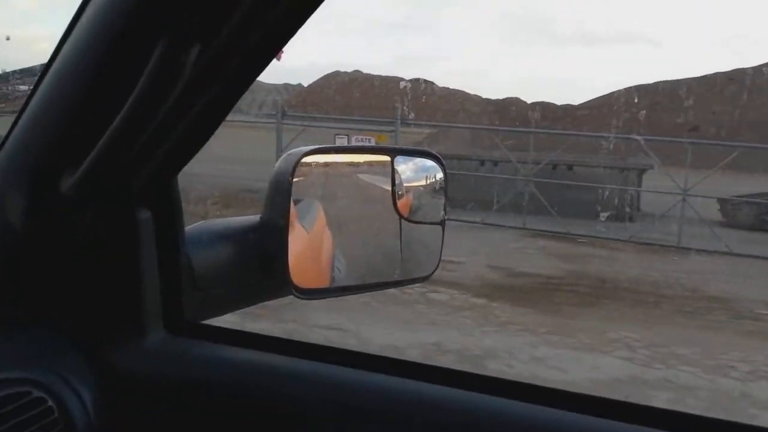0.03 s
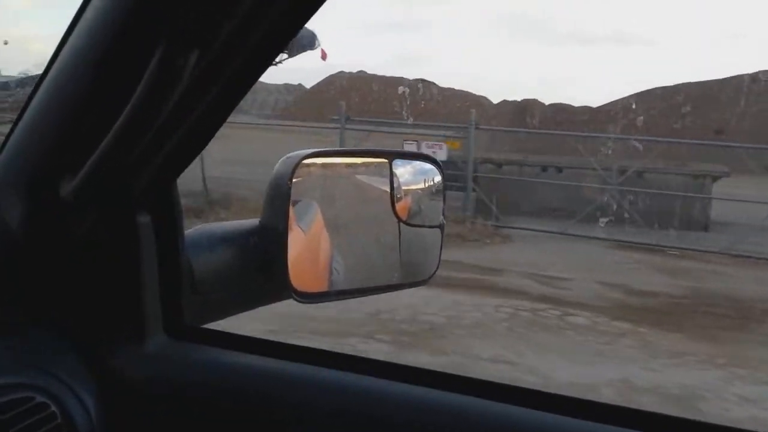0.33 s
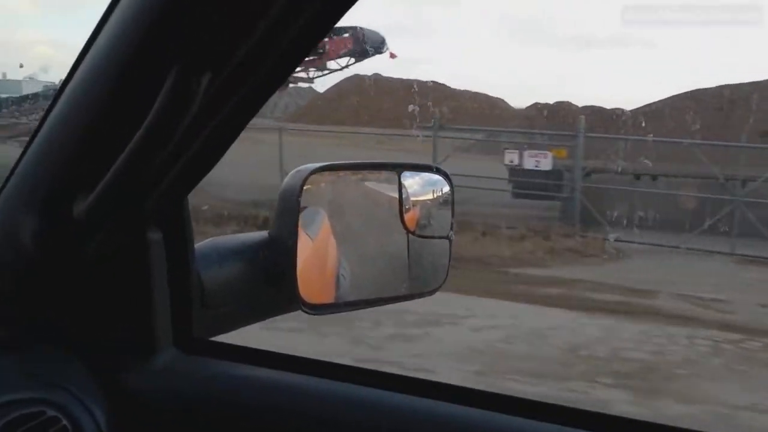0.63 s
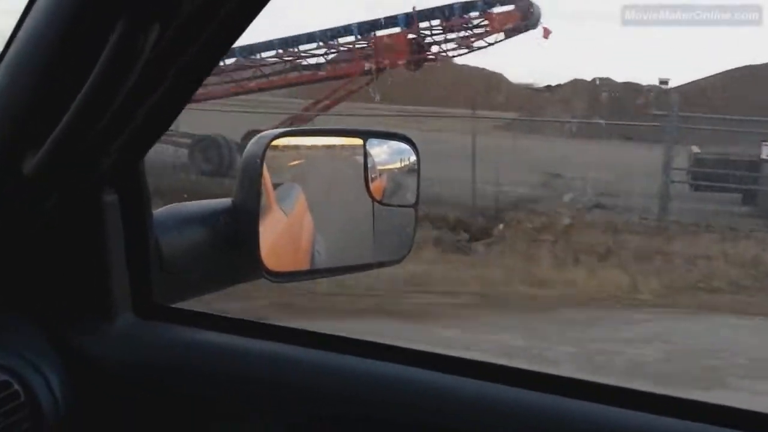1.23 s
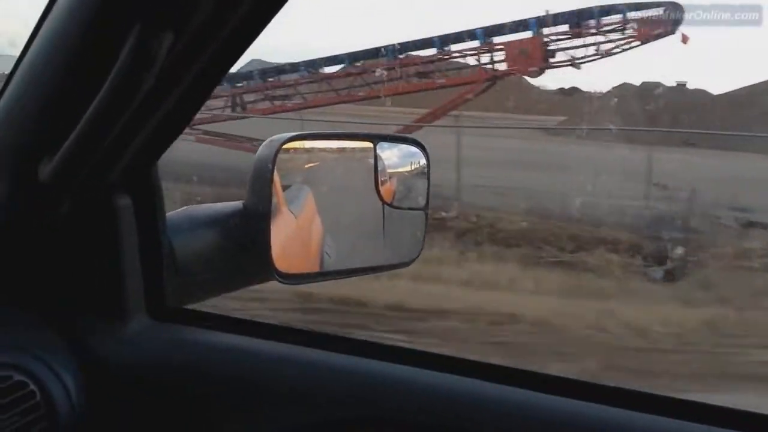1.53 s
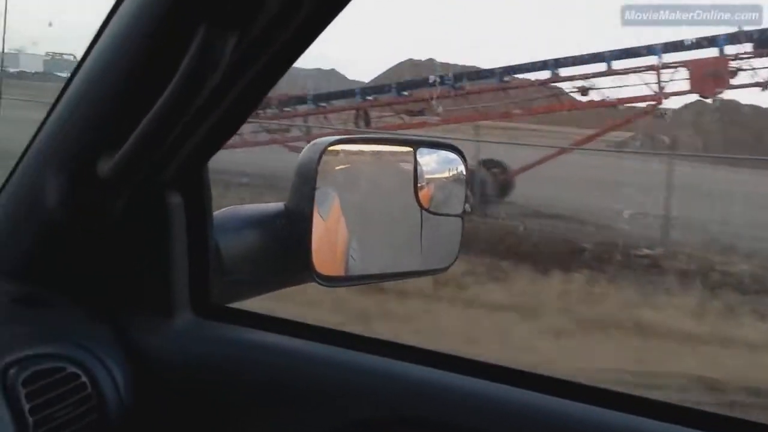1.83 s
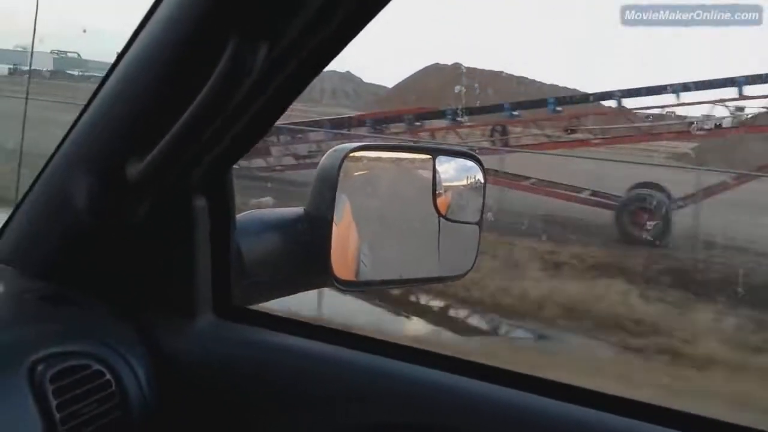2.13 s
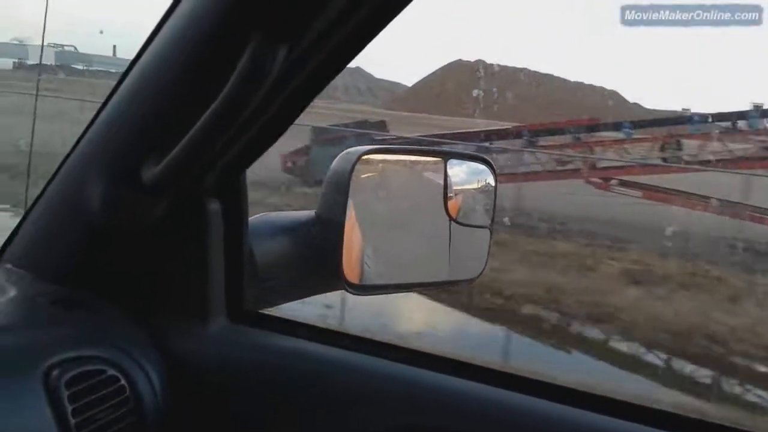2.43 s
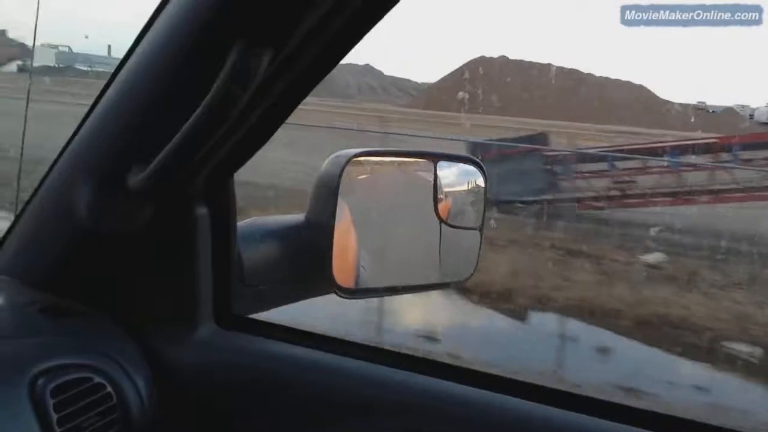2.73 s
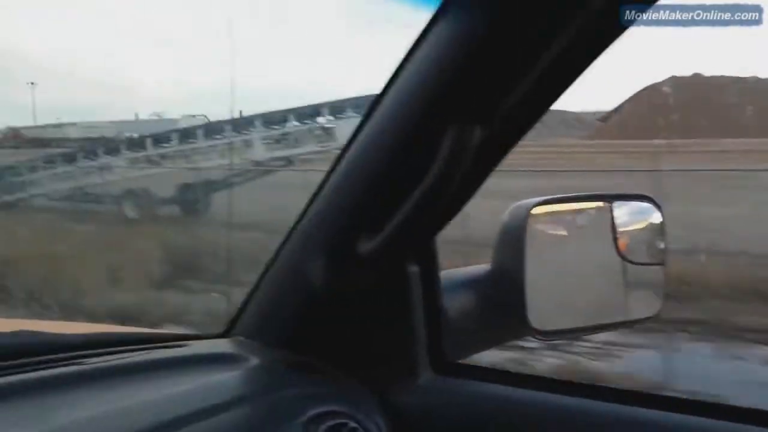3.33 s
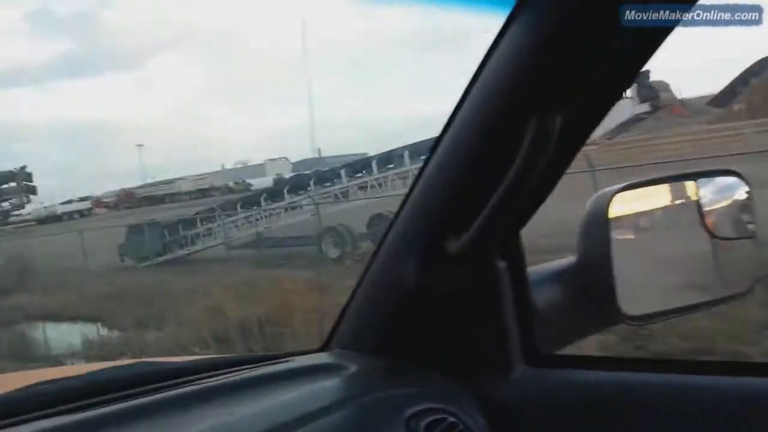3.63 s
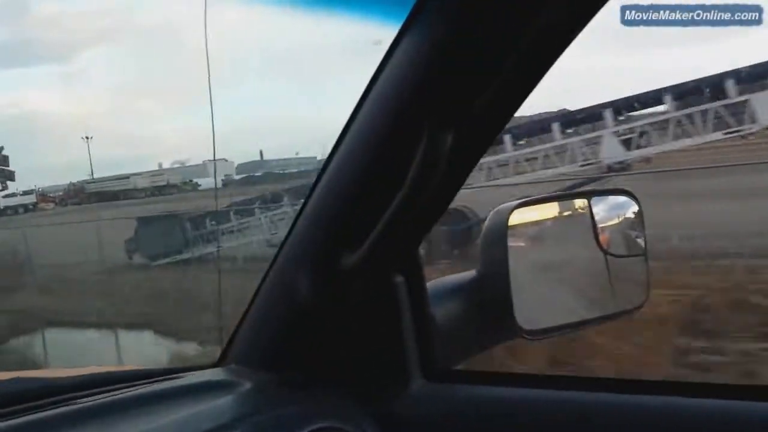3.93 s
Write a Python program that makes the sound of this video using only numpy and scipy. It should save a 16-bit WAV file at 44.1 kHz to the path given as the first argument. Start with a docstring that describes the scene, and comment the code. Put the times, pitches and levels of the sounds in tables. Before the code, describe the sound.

Heard from beside the cab's side window, a diesel truck pulls through one gear, growling over road rumble while its turbo whistles higher. Trim squeaks faintly, then the revs dip, flare briefly and fall away with the whistle.

```python
"""A six-cylinder diesel truck pulls through one gear, heard in the cab beside the side window.
From the start, firings boom, growl and clatter over tyre rumble and a deep cab shudder. From 1.2 s the
turbo whistles upward over rushing intake air; from 2.5 s rubbing trim squeaks. At 3 s the throttle
lifts: the engine drops, flares once and runs down with the turbo; loose trim ticks, something brushes."""
import sys
import numpy as np
from scipy import signal
from scipy.fft import rfft, irfft
from scipy.io import wavfile
from scipy.ndimage import uniform_filter1d, minimum_filter1d

SR = 44100
rng = np.random.default_rng(int(sys.argv[2]) if len(sys.argv) > 2 else 0)


def generate_wav(signal):
    """Clip the signal to [-1, 1] and save it as 16-bit WAV at the path in sys.argv[1]."""
    frames = np.transpose(np.atleast_2d(signal))
    scaled = np.clip(frames, -1, 1) * 32767
    pcm = np.round(scaled).astype(np.int16)
    wavfile.write(sys.argv[1], SR, pcm)


N = 176400
TIME_S = np.arange(N) / SR
BINS_HZ = np.fft.rfftfreq(N, 1 / SR)
CYLINDERS = 6

# Engine speed: time_s, firing_hz
FIRING_RATE = [(0, 89.2), (.5, 101.4), (.8, 111.8), (1, 118.8), (1.2, 123.7), (1.45, 130.4), (1.62, 131.6),
               (1.78, 134.7), (1.95, 132.6), (2.2, 138.6), (2.33, 137), (2.44, 139), (2.6, 136),
               (2.8, 138.6), (2.98, 135.4), (3.025, 103), (3.08, 95.74), (3.135, 79.8), (3.21, 144.4),
               (3.29, 143.3), (3.38, 135.4), (3.6, 124.7), (3.8, 106.6), (4, 97.3)]
# Tones at 1, 2 and 1.5 times the firing rate: time_s, level_db
BOOM_LEVEL = [(0, -19.5), (.38, -21), (.51, -33.5), (.65, -20.5), (.85, -18), (.98, -25.5), (1.1, -21.5),
              (1.5, -21.5), (1.8, -30), (2.2, -23.5), (2.5, -23), (2.9, -19.5), (3.05, -31), (3.11, -20),
              (3.16, -26), (3.27, -21), (3.38, -26.5), (3.48, -31), (3.6, -29.5), (3.76, -31.5), (4, -29)]
OCTAVE_LEVEL = [(0, -27), (.25, -26.5), (.65, -26), (.88, -34), (1.5, -36), (1.8, -32), (2.25, -26.5),
                (2.48, -32), (2.65, -26.5), (2.9, -24.5), (2.99, -33.5), (3.06, -21.5), (3.13, -27),
                (3.2, -37), (3.29, -18.5), (3.34, -25.5), (3.38, -42), (4, -40.5)]
THROB_LEVEL = [(0, -42), (.7, -32.5), (1.3, -30.5), (1.6, -30), (2.05, -27), (2.35, -27.5), (2.9, -29),
               (3.05, -42), (3.2, -40), (3.29, -24.5), (3.37, -24), (3.43, -41), (3.65, -37), (3.72, -32),
               (3.8, -41), (4, -42)]
# Growl orders of uneven cylinders: cycle_multiple, base_db
GROWL_ORDERS = [(3, -24), (4, -33), (5, -36.5), (7, -36.5), (8, -30), (10, -34.5), (11, -32.5), (14, -35.5),
                (15, -35), (18, -33.5), (20, -43.5)]
# Block orders that reach the panels: cycle_multiple
BLOCK_ORDERS = [21, 24, 27, 30, 33, 36, 40, 42, 48, 50, 56, 60, 66, 72]
# Panel resonances: freq_hz, gain_db
PANEL_RESPONSE = [(300, 4), (420, -2), (510, 2), (552, 7), (600, 1), (700, -5), (735, -4), (762, 2),
                  (810, -1), (870, -6), (980, -7), (1090, 0), (1190, -7), (1284, 2), (1400, -5),
                  (1600, -10)]
# Exhaust growl, flare rasp, block orders, combustion clatter, lugging knock: time_s, gain_db
GROWL_GAIN = [(0, -10), (.9, -6.5), (1.5, -6.5), (2, -2), (2.9, -0.5), (3.02, -2.5), (3.17, -3), (3.28, 0),
              (3.36, -4.5), (3.43, -7.5), (3.7, -11), (4, -8.5)]
RASP_GAIN = [(3.1, -60), (3.19, -40), (3.24, -26.5), (3.32, -25.5), (3.37, -34), (3.45, -58)]
BLOCK_GAIN = [(0, -1), (.7, -1), (1.1, -2), (1.7, 1), (2.9, 0), (3.04, -9), (3.17, -7), (3.28, 4),
              (3.45, -9), (4, -11)]
CLATTER_GAIN = [(0, -4.5), (.7, -0.5), (1.5, 0.5), (2.3, 1.5), (2.88, 3), (3.02, -3.5), (3.17, -3.5),
                (3.25, 0), (3.32, -0.5), (3.44, -5.5), (3.7, -6), (4, -3.5)]
KNOCK_GAIN = [(0, -40), (.6, -38), (1.1, -45.5), (1.6, -58), (3.4, -47), (4, -63)]
# Exhaust and combustion noise: freq_hz, relative_db
PUFF_SPECTRUM = [(60, -15), (150, -6), (280, -10.5), (400, 1), (500, -21), (640, 4), (850, -25),
                 (1500, -32), (4000, -60)]
RASP_SPECTRUM = [(100, -24), (280, -3), (430, -1), (520, -3), (640, 0), (800, -9), (1000, -8), (1400, -16),
                 (2200, -14), (3200, -26), (8000, -50)]
CLATTER_SPECTRUM = [(200, -24), (500, -1.5), (750, -1), (1100, -4), (1400, -2), (1700, -2), (2200, -0.5),
                    (2600, -3), (2900, -2), (3300, -7), (4300, -8.5), (6000, -26), (10000, -63),
                    (16000, -59)]
KNOCK_SPECTRUM = [(400, -7), (620, 3), (900, 0), (1080, 5.5), (1320, 6.5), (1600, -5), (1790, 1.5),
                  (1950, -18), (3500, -44)]

# Turbo blade tone: time_s, pitch_hz
TURBO_PITCH = [(1.15, 5200), (1.35, 5810), (1.47, 6220), (1.6, 6580), (1.77, 7060), (1.95, 7320),
               (2.08, 7560), (2.18, 7730), (2.35, 7840), (2.43, 8035), (2.64, 8360), (2.72, 8610),
               (2.8, 8765), (2.93, 8950), (3, 8730), (3.05, 8330), (3.13, 7840), (3.21, 7500), (3.5, 6400),
               (3.85, 5400), (4, 5050)]
# Clear whistle, fuzz around it, intake rush, intake ring: time_s, gain_db
WHISTLE_GAIN = [(1.2, -80), (1.36, -56), (1.56, -59), (1.6, -48.5), (1.65, -59), (1.73, -60), (1.775, -49),
                (1.83, -65), (1.95, -48), (2.02, -55), (2.12, -52), (2.17, -40.5), (2.22, -46),
                (2.27, -36.5), (2.35, -38), (2.38, -53), (2.45, -45), (2.62, -57), (2.71, -43), (2.75, -54),
                (2.785, -44), (2.86, -55), (2.92, -45), (2.98, -50), (3.04, -43), (3.12, -60), (3.18, -65),
                (3.21, -49), (3.25, -62), (3.31, -55), (3.42, -65), (3.54, -55), (3.62, -68), (4, -70)]
FUZZ_GAIN = [(1.1, -95), (1.5, -64), (2.1, -62), (2.4, -58), (2.9, -57), (3.05, -55), (3.2, -59),
             (3.45, -59), (3.65, -65), (3.9, -68)]
RUSH_GAIN = [(0, -8), (.8, -5), (1.6, -2), (2.3, -0.5), (2.85, 2), (3.05, -1), (3.35, 0), (3.7, -5.5),
             (4, -4.5)]
RING_GAIN = [(0, -48), (.65, -44), (1.1, -48), (1.6, -53), (3, -53), (3.4, -48), (4, -52.5)]
# Intake noise: freq_hz, relative_db
RUSH_SPECTRUM = [(800, -41), (2000, -9.5), (3300, -1), (4400, -6.5), (5300, -5), (6200, -5.5), (8000, -9),
                 (9500, -13.5), (11000, -18.5), (13000, -22.5), (15500, -28)]
RING_SPECTRUM = [(2500, -38), (4250, -25), (4420, 10), (4540, 0), (4720, -0.5), (5000, 0), (5350, 1),
                 (5560, -4), (5800, -31), (9000, -54)]

# Tyre rumble, cab shake: time_s, gain_db
RUMBLE_GAIN = [(0, -5.5), (.9, -4), (1.5, -0.5), (2.4, -4), (3.1, -0.5), (3.4, -2), (3.7, -4), (4, -4.5)]
SHAKE_GAIN = [(0, -11), (.9, -1.5), (1.1, 2), (1.5, 4), (2.1, 1), (2.9, 6.5), (3.1, 3), (3.36, 5),
              (3.5, -3.5), (3.64, 3), (3.76, -0.5), (4, 4.5)]
# Tyre rumble, cab shake, brushing: freq_hz, relative_db
RUMBLE_SPECTRUM = [(20, 6.5), (60, -13), (110, 1), (190, -2), (260, -11.5), (420, -11.5), (640, -22),
                   (800, -18), (1000, -26), (2000, -26), (5000, -84)]
SHAKE_SPECTRUM = [(1, -60), (8, -14), (14, -1), (22, 0), (40, -8.5), (56, -19), (90, -33), (300, -70),
                  (2000, -150)]
BRUSH_SPECTRUM = [(2000, -12), (5000, -1), (9000, -1), (11800, 1), (13200, -7), (15500, -5)]
# Rubbing trim: start_s, length_s, level_db, pitch_hz
TRIM_SQUEAKS = [(2.457, .024, -39, 3690), (2.574, .026, -35, 3590), (2.795, .018, -37, 3830),
                (2.864, .02, -41, 3790)]
# Loose trim: start_s, level_db, ring_hz
TRIM_TICKS = [(2.954, -35, 2400), (3.513, -33, 2200), (3.745, -30, 12000), (3.836, -43, 11500),
              (3.854, -45, 11800)]
# Rustles: centre_s, half_width_s, level_db
BRUSH_STROKES = [(3.567, .018, -51), (3.751, .016, -42), (3.845, .034, -49.5)]

# Left-right likeness of cab noise: freq_hz, correlation
CAB_COHERENCE = [(30, 1), (120, 1), (300, 1), (600, 0.86), (1200, 0.21), (3000, 0.22), (12000, 0.043)]
# Right side behind left: freq_hz, lag_rad
RIGHT_LAG = [(0, 0), (15, .06), (40, .13), (90, .26), (170, .46), (350, .55), (780, 1.11), (1810, 3),
             (4480, 13), (5430, 16.5), (6890, 13.5), (7580, 14.5), (10900, 10), (13600, 21), (15200, 17)]


def engine():
    """Tones, exhaust puffs and rasp, diesel clatter and hollow knock, all locked to the crank."""
    cycles = np.cumsum(curve(FIRING_RATE) * (1 + 0.0012 * wander(9))) / SR / CYLINDERS
    strokes = firing_pulses(cycles, decay_firings=0.085, cylinder_db=1.5, stroke_db=1)
    puffs = noise(PUFF_SPECTRUM, 0.56 + strokes) * amp(curve(GROWL_GAIN) - 37) * pan(5.4)
    rasp = noise(RASP_SPECTRUM, 1 + strokes, ripple_db=3.3)
    rasp *= amp(curve(RASP_GAIN) - 1.5) * pan(0.71)
    combustion = firing_pulses(cycles, decay_firings=0.33, cylinder_db=3, stroke_db=3.5)
    clatter = noise(CLATTER_SPECTRUM, 3.5 + combustion, ripple_db=3.3, ripple_step_hz=44.56)
    clatter *= amp(curve(CLATTER_GAIN) - 36.5) * pan(-2)
    knock = noise(KNOCK_SPECTRUM, 3.6 + strokes, ripple_db=3, ripple_step_hz=45)
    knock *= amp(curve(KNOCK_GAIN)) * pan(-3.4)
    return engine_tones(cycles) + puffs + rasp + clatter + knock


def engine_tones(cycles):
    """Firing boom, growl of uneven cylinders, and block orders sweeping through panel resonances."""
    def order(multiple, level_db, wander_db):
        peak = np.sqrt(2) * amp(level_db + wander_db * wander(4.26))
        return peak * np.sin(2 * np.pi * (multiple * cycles + rng.random()) + 0.33 * wander(25.3))

    growl_db, block_db = curve(GROWL_GAIN), curve(BLOCK_GAIN) - 48
    cycle_hz = curve(FIRING_RATE) / CYLINDERS
    boom = order(CYLINDERS, curve(BOOM_LEVEL), wander_db=1)
    boom += order(2 * CYLINDERS, curve(OCTAVE_LEVEL), wander_db=0.7)
    boom += order(1.5 * CYLINDERS, curve(THROB_LEVEL), wander_db=1.6)
    growl = sum(order(k, base_db + growl_db, wander_db=2) for k, base_db in GROWL_ORDERS)
    block = sum(order(k, block_db + at_freq(PANEL_RESPONSE, k * cycle_hz), wander_db=2.06)
                for k in BLOCK_ORDERS)
    return boom + growl * pan(0.55) + block * pan(-0.45)


def firing_pulses(cycles, decay_firings, cylinder_db, stroke_db):
    """A sharp burst per firing; size scatters by cylinder and by stroke."""
    firings = cycles * CYLINDERS
    stroke = firings.astype(int)
    size_db = cylinder_db * unit(rng.standard_normal(CYLINDERS))[stroke % CYLINDERS]
    size_db += stroke_db * rng.standard_normal(1024)[stroke % 1024]
    return unit(amp(size_db) * np.exp(-(firings % 1) / decay_firings))


def turbo():
    """Fluttering blade whistle in a narrow band of fuzz, on the window side."""
    pitch_hz = curve(TURBO_PITCH) * (1 + 0.0018 * wander(63))
    carrier = np.exp(2j * np.pi * np.cumsum(pitch_hz) / SR)
    sides = []
    for _ in range(2):
        clear = amp(curve(WHISTLE_GAIN) - 1 + 3.2 * wander(24)) * np.exp(2j * np.pi * rng.random())
        fuzz_db = curve(FUZZ_GAIN) + 2 + 5 * wander(33)
        fuzz = amp(fuzz_db) * (wander(300) + 1j * wander(300))
        sides.append(np.sqrt(2) * ((clear + fuzz) * carrier).real)
    return np.array(sides) * pan(12.4)


def intake():
    """Air rushes in; the intake rings at 4.4-5.5 kHz."""
    rush = noise(RUSH_SPECTRUM, amp(0.44 * wander(90)), ripple_db=3.5, ripple_step_hz=87.9)
    ring = noise(RING_SPECTRUM, amp(2 * wander(36)), ripple_db=3.5)
    return rush * amp(curve(RUSH_GAIN) - 44) * pan(11.3) + ring * amp(curve(RING_GAIN)) * pan(3.9)


def road_rumble():
    """Jolting tyre noise through the body."""
    rumble = noise(RUMBLE_SPECTRUM, ripple_db=3.5, ripple_step_hz=30.17)
    jolt_db = 2 * wander(7)
    return rumble * amp(curve(RUMBLE_GAIN) - 23.5 + jolt_db) * pan(0.28)


def cab_shake():
    """The cab shakes with a deep, even shudder."""
    shudder = unit(np.tanh(1.1 * noise(SHAKE_SPECTRUM)))
    return shudder * amp(curve(SHAKE_GAIN) - 17) * pan(0.76)


def trim_squeaks():
    """Trim rubs in short chirps: two wavering modes and their octaves."""
    chirps = np.zeros(N)
    for start_s, length_s, level_db, pitch_hz in TRIM_SQUEAKS:
        swell = np.sin(np.pi * np.clip((TIME_S - start_s) / length_s, 0, 1))
        phase_rad = 2 * np.pi * np.cumsum(pitch_hz * (1 + 0.012 * wander(130))) / SR
        for ratio, mode_db in ((1, 0), (1.13, -4)):
            mode = np.sin(ratio * phase_rad) + amp(-8) * np.sin(2 * ratio * phase_rad)
            chirps += swell * amp(level_db + mode_db) * mode
    return chirps * pan(4.2)


def trim_ticks(decay_s=0.003, skirt_db=-15, skirt_ratio=2 ** 0.18):
    """Loose trim ticks: a broad snap with one short ring."""
    ticks = np.zeros((2, N))
    for start_s, level_db, ring_hz in TRIM_TICKS:
        spectrum = [(ring_hz / 4, -40), (ring_hz / 2, skirt_db), (ring_hz / skirt_ratio, skirt_db),
                    (ring_hz, 0), (ring_hz * skirt_ratio, skirt_db), (ring_hz * 4, -40)]
        envelope = (TIME_S >= start_s) * np.exp(-abs(TIME_S - start_s) / decay_s)
        ticks += noise(spectrum) * amp(level_db) * envelope
    return ticks * pan(9)


def brushes():
    """Three brief, bright, grainy rustles close by."""
    envelope = sum(amp(level_db) / (1 + ((TIME_S - centre_s) / half_width_s) ** 2) ** 1.17
                   for centre_s, half_width_s, level_db in BRUSH_STROKES)
    grit = amp(3.2 * wander(296))
    return noise(BRUSH_SPECTRUM, grit, ripple_db=3.5, ripple_step_hz=303) * envelope * pan(9)


def noise(spectrum, gate=1, ripple_db=0, ripple_step_hz=60):
    """Gated stereo noise, coloured, then rippled by the cab's midrange resonances; rms 1."""
    left, independent = rfft(rng.standard_normal((2, N)) * gate)
    coherence = at_freq(CAB_COHERENCE, BINS_HZ)
    right = coherence * left + np.sqrt(1 - coherence ** 2) * independent
    ripple = np.array([np.interp(BINS_HZ / ripple_step_hz, np.arange(len(row)), row)
                       for row in rng.standard_normal((2, 1024))])
    midrange = BINS_HZ / (BINS_HZ + 500) / (1 + (BINS_HZ / 5000) ** 4)
    gain = amp(at_freq(spectrum, BINS_HZ) + ripple_db * midrange * ripple)
    return unit(irfft(np.array([left, right]) * gain, N))


def wander(cutoff_hz):
    """Low-passed random motion, rms 1."""
    return unit(irfft(rfft(rng.standard_normal(N)) / (1 + (BINS_HZ / cutoff_hz) ** 4), N))


def curve(table):
    """Time table at every sample."""
    return np.interp(TIME_S, *np.transpose(table))


def at_freq(table, freq_hz):
    """Frequency table, interpolated on a log axis."""
    points_hz, values = np.transpose(table)
    return np.interp(np.log(freq_hz + 1), np.log(points_hz + 1), values)


def pan(left_db):
    """Channel gains for a left-minus-right level."""
    return amp(np.array([[left_db], [-left_db]]) / 2)


def amp(db):
    """Decibels to gain."""
    return 10 ** (np.asarray(db) / 20)


def unit(x):
    """Scale to rms 1."""
    return x / np.sqrt(np.mean(x ** 2) + 1e-20)


def scene():
    """Cab mix; engine, road and cab shake reach the left side first."""
    left, right = engine() + road_rumble() + cab_shake()
    lag = np.exp(-1j * at_freq(RIGHT_LAG, BINS_HZ))
    truck = np.array([left, irfft(rfft(right) * lag, N)])
    return truck + turbo() + intake() + trim_squeaks() + brushes() + trim_ticks()


def record(dry):
    """Gentle limiter, end fades, low-pass."""
    ceiling, window_samples, fade_s, cutoff_hz = 0.88, 1500, 0.006, 15700
    gain = ceiling / np.maximum(abs(dry).max(0), ceiling)
    limited = dry * uniform_filter1d(minimum_filter1d(gain, window_samples), window_samples)
    from_end_s = np.minimum(TIME_S, TIME_S[::-1])
    fades = np.sin(np.pi / 2 * np.minimum(from_end_s / fade_s, 1)) ** 2
    lowpass = signal.firwin(511, cutoff_hz, window=("kaiser", 9), fs=SR)
    return signal.oaconvolve(limited * fades, lowpass[None], "same")


dry = scene()
out = record(dry)
generate_wav(out)
```